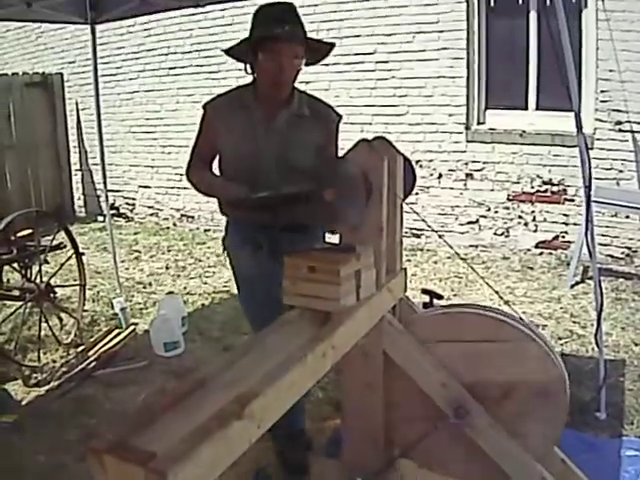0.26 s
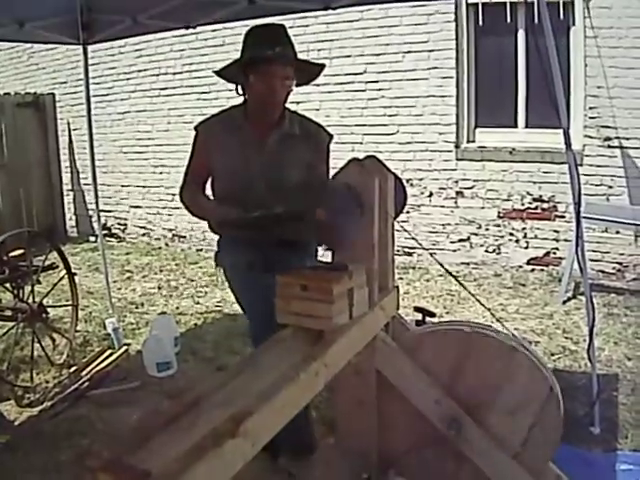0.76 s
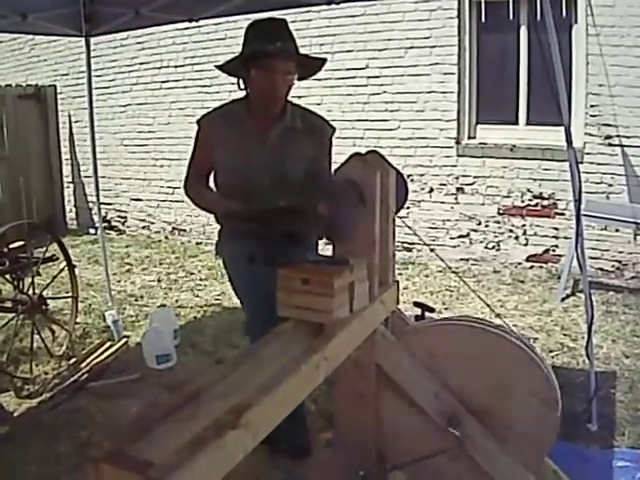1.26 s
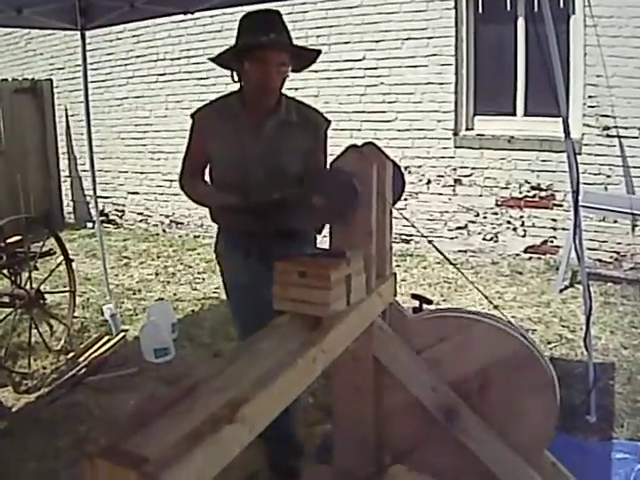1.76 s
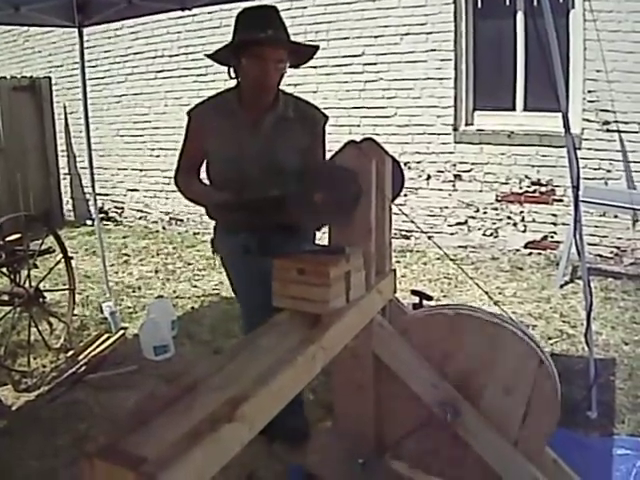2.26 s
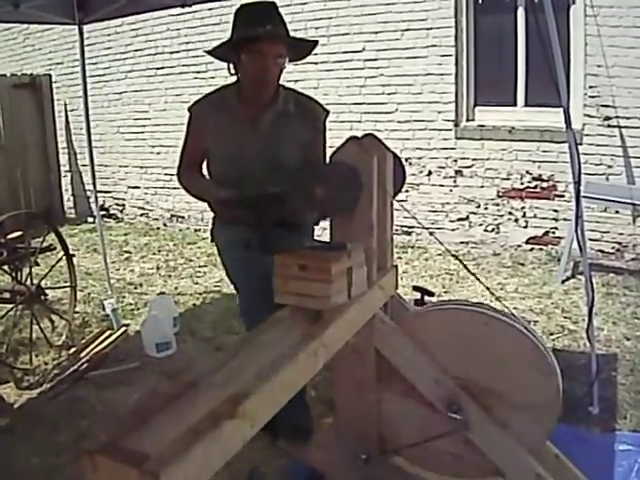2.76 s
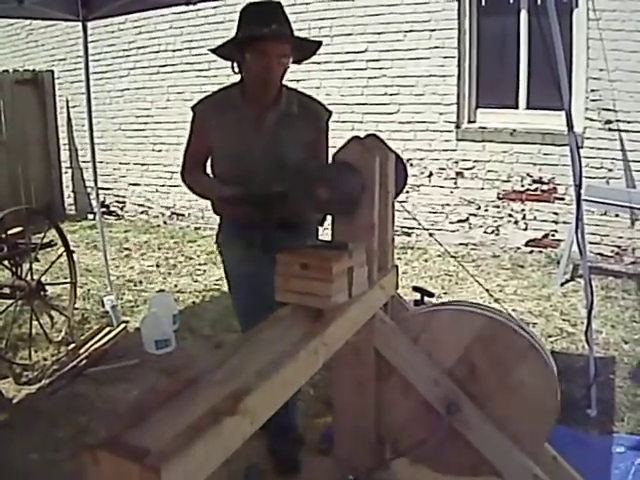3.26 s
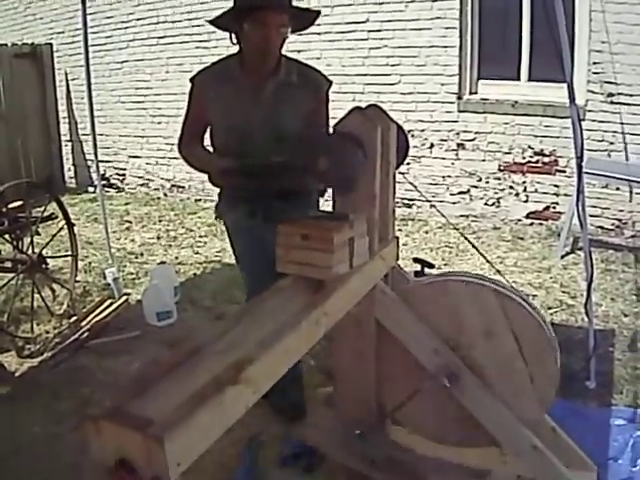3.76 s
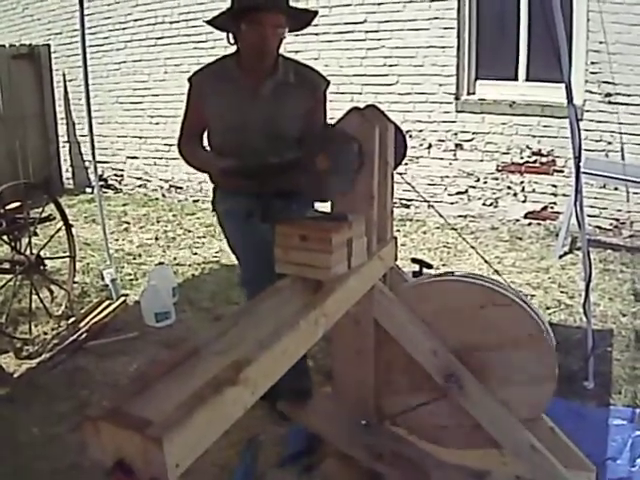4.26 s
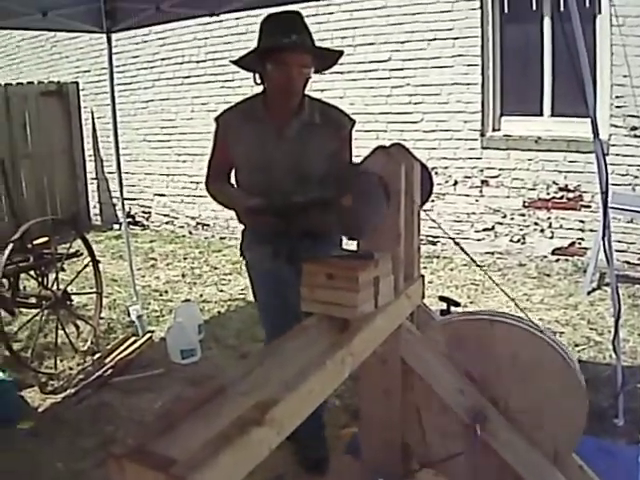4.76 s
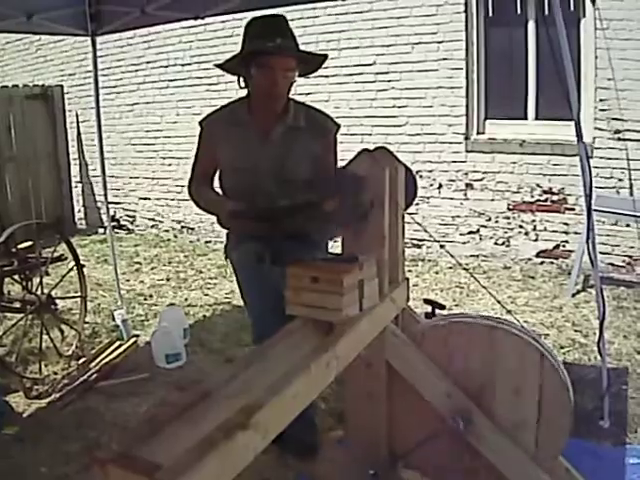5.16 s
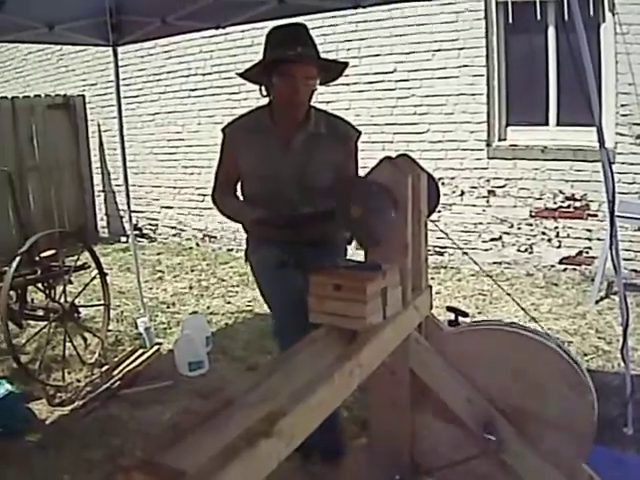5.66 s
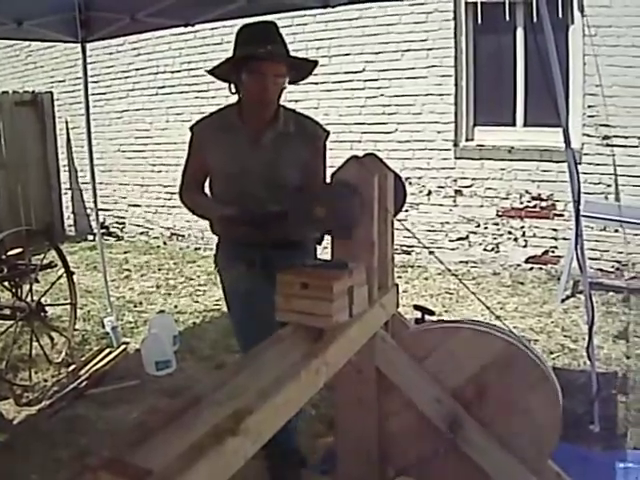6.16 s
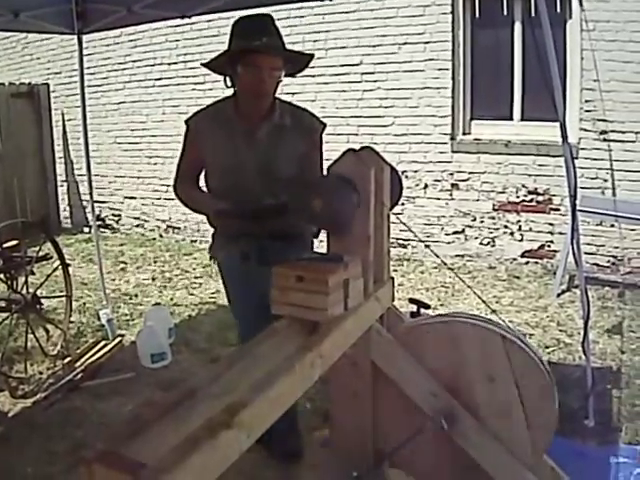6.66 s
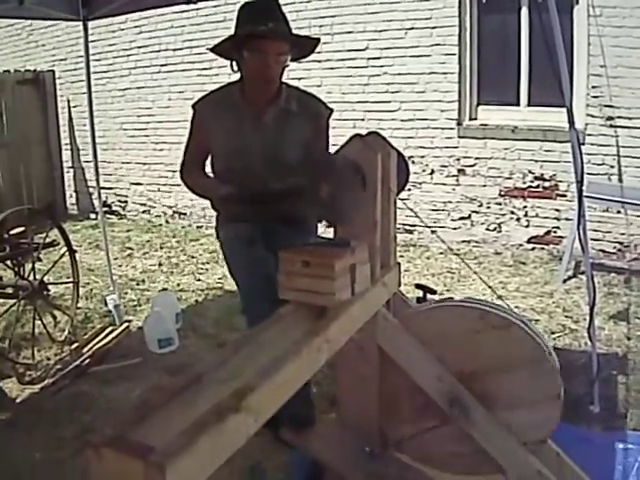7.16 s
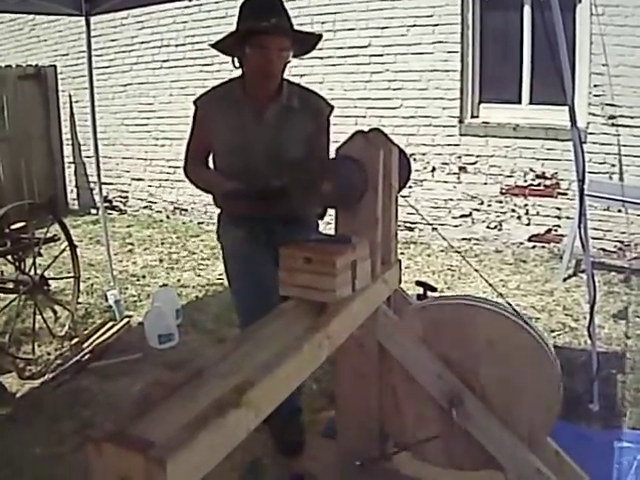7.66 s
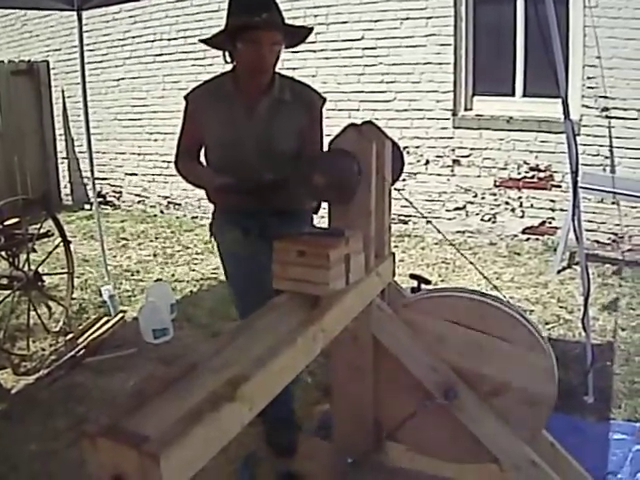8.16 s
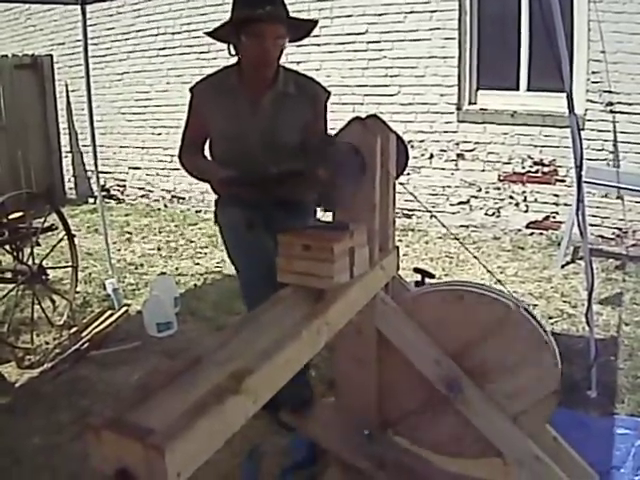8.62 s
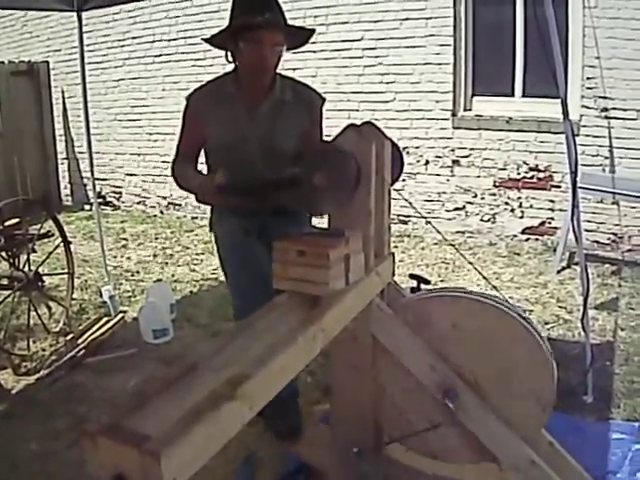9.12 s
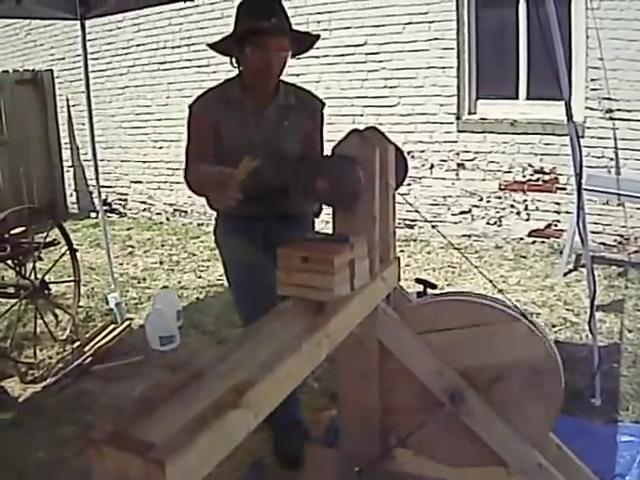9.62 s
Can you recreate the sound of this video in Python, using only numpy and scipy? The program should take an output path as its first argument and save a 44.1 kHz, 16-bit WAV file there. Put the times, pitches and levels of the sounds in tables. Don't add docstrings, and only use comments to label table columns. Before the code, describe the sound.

A wooden treadle lathe is already running and never stops through about 9.9 seconds. Every 0.7 seconds a hard crank slam, from 0.3 seconds onward, is followed by a woody rebound and a hollow stop, with small slack clicks and joint chatter. The gouge rasps steadily but unevenly, snapping about twelve times a second in short runs and peeling a brief hissing shaving after each slam. Rubbing is fuller around 1.1 to 2.3 seconds; rough catches burst at 1.2, 1.9, 3.4 and 5.6. Strong stop knocks come near 4.3, 7.2 and 7.9, and the final stop at 9.3 is weak. Behind, tyre roar and a vehicle's hum swell until 2.6 seconds, then a faint idle and a low drone from about 4.6 continue as traffic thins. Close, short wall echoes; a dull, narrow-band small microphone flattens peaks.

```python
import sys
import numpy as np
from scipy import signal
from scipy.io import wavfile
from scipy.ndimage import uniform_filter1d

SR = 44100
rng = np.random.default_rng(int(sys.argv[2]) if len(sys.argv) > 2 else 0)


def magnitude_from_level(level_db):
    exponent = np.asarray(level_db, float) / 20
    return 10 ** exponent


def generate_wav(sig):
    pcm = np.round(np.clip(np.atleast_2d(sig).T, -1, 1) * 32767).astype(np.int16)
    wavfile.write(sys.argv[1], SR, pcm)


N = 436149

# t/s, low wood level/dB, hard parts level/dB, gouge bite level/dB
TOP_STOPS = [(0.022, -1, -10, -6.5), (1.42, -3, -16, -20), (2.162, -3.5, -12.5, -23.5),
             (2.918, -2.5, -16, -16), (3.632, -1, -5, -12), (4.341, 0.5, -10, -14.5),
             (5.034, -3.5, -15.5, -22), (5.78, -5.5, -18.5, -22.5), (6.513, -3, -11, -7.5),
             (7.208, 0.5, -9, -6), (7.936, 0, -9, -6.5), (8.638, -3.5, -11.5, -9.5), (9.337, -16, -20, -16)]
SLACK_BLOWS = [(0.288, -14.5, -19.5, -21), (1.743, -13, -14, -21.5), (3.202, -11.5, -15, -25),
               (3.6, -13.5, -14, -23), (3.919, -15.5, -14.5, -8), (4.324, -15, -11.5, -9),
               (4.618, -8.5, -15.5, -6), (6.123, -6.5, -20, -8), (6.528, -11, -15.5, -14),
               (6.821, -10, -15.5, -1.5), (7.513, -10, -14.5, -3.5), (8.216, -8, -13, -2.5),
               (8.925, -7, -10.5, -6.5), (9.617, -10, -20.5, -25)]
CRANK_SLAMS = [(0.323, -7.5, -8, -3.5, -20.5), (1.051, -6.5, -7.5, -11, -18), (1.778, -8, -9.5, -1, -15.5),
               (2.527, -9, -12.5, -1.5, -17), (3.24, -15.5, -9, -15, -18), (3.952, -12, -9, -5, -14.5),
               (4.651, -6, -8.5, -18.5, -18), (5.407, -8.5, -8.5, -5, -18.5), (6.157, -7.5, -7.5, -8, -22),
               (6.852, -6.5, -8, -11.5, -18.5), (7.553, -6, -7.5, -6, -17),
               (8.261, -7.5, -8.5, -10.5, -19.5), (8.967, -16, -8.5, -1, -19.5),
               (9.683, -6.5, -8.5, -1, -22)]
REBOUNDS = [
    (0.48, -4.5, -18.5, -11.5),
    (1.2, -8.5, -13, -5),
    (1.929, -17.5, -19, -9.5),
    (2.684, -11, -19.5, -12),
    (3.385, -19.5, -22, -2),
    (4.469, -6.5, -11.5, -6),
    (4.81, -6.5, -16.5, -4.5),
    (5.568, -11, -21, 0),
    (6.565, -8, -24, -25),
    (6.996, -17, -20.5, -9.5),
]
# rail re plank level/dB, pin re upright level/dB, bite ring f/Hz, bite length t/s
BLOW_KINDS = [
    (-8, -5, 2700, .06),
    (-3.5, -2.5, 3350, .04),
    (-6, -0.5, 3100, 0.061),
    (-22, -1.5, 3330, .04),
]
BLOW_TABLES = (TOP_STOPS, SLACK_BLOWS, CRANK_SLAMS, REBOUNDS)
SHAVING_LAG_S = .012


def evened(x):
    return x / np.sqrt(np.mean(x ** 2) + 1e-20)


def add(mix, s, sound):
    part = mix[max(round(s * SR), 0):][:len(sound)]
    part += sound[:len(part)]


def follow(rows, column):
    rows = np.array(rows)
    return np.interp(np.arange(N) / SR, rows[:, 0], rows[:, column])


def resonate(x, hz, width):
    phase = 2 * np.pi * np.cumsum(hz * np.ones(len(x))) / SR
    turn = np.exp(1j * phase)
    r = np.exp(-np.pi * width / SR)
    return 2 * (turn * signal.lfilter([1 - r], [1, -r], x / turn)).real


def treadle():
    # f/Hz, level/dB, t60/s
    plank_modes = [(715, 3, 0.031), (789, 1, 0.034), (856.5, 1.5, 0.034), (630, -11, 0.11)]
    # f/Hz, level/dB, t60/s
    rail_modes = [(389.4, 0, 0.11), (445, -0.5, 0.089), (486.4, 4, 0.048), (351.4, -11, 0.16)]
    # f/Hz, level/dB, t60/s
    upright_modes = [(1016, 6, 0.041), (1143.6, 10, 0.025), (1298, 8.5, 0.022), (1412, 0.5, 0.048)]
    # f/Hz, level/dB, t60/s
    pin_modes = [(2065, 8.5, 0.024), (1800, -2.5, 0.05), (2334, -2.5, 0.065), (1763, -12.5, 0.06)]
    # t/s, level/dB
    frame_jolts = [(0.322, -26), (1.048, -33.5), (1.2, -17), (1.777, -30.5), (1.929, -23.5), (2.529, -25.5),
                   (3.385, -21.5), (3.632, -19.5), (3.953, -21.5), (4.341, -31), (5.567, -40), (6.16, -27),
                   (6.854, -25), (7.209, -20), (7.934, -14), (8.26, -33.5), (8.967, -29)]
    parts = (plank_modes, rail_modes, upright_modes, pin_modes)
    t = np.arange(6000) / SR
    out = np.zeros(N)
    onset = 1 - np.exp(-t / 0.0019)
    blows = knocks()
    luck = rng.random((len(blows), 4, 4, 2))
    chatter = rng.standard_normal((len(blows), len(t)))
    for (s, db, *rel_db), draws, noise in zip(blows, luck, chatter):
        ring = np.zeros(len(t))
        for modes, part_db, pairs in zip(parts, [0, *rel_db], draws):
            for (hz, mode_db, t60), (u, v) in zip(modes, pairs):
                tone = np.sin(2 * np.pi * hz * (.98 + 0.06 * u) * t)
                ring += magnitude_from_level(part_db + mode_db - 3.2 * v - 60 * t / t60) * tone
        hits = noise * magnitude_from_level(-36.0 - 60 * t / 0.24)
        hits[0] = 1
        knock = signal.fftconvolve(ring * onset, hits)[:len(t)]
        add(out, s - .0005, magnitude_from_level(db + 1.5) * knock)
    for s, db in frame_jolts:
        add(out, s, -magnitude_from_level(db + 1.5) * signal.windows.hann(round(0.0045 * SR)))
    return yard(out)


def knocks():
    out = []
    for rows, (rail_db, pin_db, *_) in zip(BLOW_TABLES, BLOW_KINDS):
        for s, low_db, hard_db, *_ in rows:
            upright_db = hard_db - low_db
            out.append((s, low_db, rail_db, upright_db, upright_db + pin_db))
    return out


def yard(x):
    # t/s, level/dB
    reflections = [(.016, -12), (.025, -21.5), (0.054, -20.5), (.078, -31.5)]
    echoes = np.zeros(SR // 10)
    echoes[0] = 1
    for s, db in reflections:
        echoes[round(s * SR)] = magnitude_from_level(db)
    return signal.oaconvolve(x, echoes)[:N]


def gouge():
    return rubbing() + biting() + catching() + shaving()


def rubbing():
    flutter = evened(uniform_filter1d(rng.standard_normal(N), size=450))
    hiss = evened(blade(fibres(N, per_s=9600, spread_db=5.5)))
    return magnitude_from_level(pressure_db() - 2.5 + 2.8 * flutter) * hiss


def pressure_db():
    # t/s, level/dB
    resting = [(0.0, -30.5), (0.5, -32.5), (1.1, -19), (2.28, -21), (2.64, -30), (3.19, -22.5),
               (3.5, -29.5), (4.24, -23.5), (4.96, -28.5), (5.5, -35), (6.08, -23.5), (6.31, -33),
               (7.13, -34.5), (8.13, -31), (8.48, -37.5), (9.47, -36.5), (9.89, -36)]
    swell_db_per_s, ease_db_per_s = 150, 111.5
    push_share = 0.47
    t = np.arange(N) / SR
    db = follow(resting, column=1)
    for rows, push_db in ((CRANK_SLAMS, -16), (TOP_STOPS, -22.5)):
        for s, low_db, *_ in rows:
            since = t - s - SHAVING_LAG_S
            fall_db = np.maximum(-swell_db_per_s * since, ease_db_per_s * since)
            db = np.maximum(db, push_db + push_share * low_db - fall_db)
    return db


def biting():
    t = np.arange(5000) / SR
    out = np.zeros(N)
    events = bites()
    tears = fibres((len(events), len(t)), per_s=16000, spread_db=3.0)
    for (s, db, hz, length), tear in zip(events, tears):
        tear = evened(tear) * magnitude_from_level(-60 * t / max(length, .01))
        tear[0] = 11
        ring = 1.37 * resonate(resonate(tear, hz, 360), hz, 540)
        steel = 0.84 * blade(tear)
        thud = 0.46 * resonate(resonate(tear, 2200, 2400), 2100, 1500)
        add(out, s - .0005, magnitude_from_level(db) * (ring + steel + thud))
    return out


def bites():
    bite_lags = [.001, -.002, -.007, -.001]
    # first t/s, last t/s, first level/dB, last level/dB, ring f/Hz
    turn_runs = [(0.096, 0.179, -9.5, -14, 3780), (1.191, 1.28, -6, -7.5, 3030),
                 (1.59, 1.681, -3.5, -3, 3413), (2.03, 2.106, -12, -5, 2970),
                 (2.206, 2.347, -10, -9.5, 3050), (3.221, 3.312, -4.5, -8.5, 2970),
                 (4.583, 4.744, -6.5, -4, 3500), (5.246, 5.333, -1.5, -7, 3550),
                 (5.931, 6.27, -13.5, -11, 3450), (6.605, 6.929, -6, -5.5, 3450),
                 (7.285, 7.452, -5.5, -7, 3550), (7.685, 7.85, -10, -19, 3530),
                 (8.019, 8.184, -8, -7, 3650), (8.255, 8.4186, -1, -4, 3590), (8.502, 8.748, -11, -3, 3740),
                 (9.003, 9.0825, -11, -7, 3600), (9.77, 9.839, -20, -11, 3030)]
    # t/s, level/dB, ring f/Hz
    single_bites = [(0.241, -18, 3570), (0.3067, -2.5, 3080), (0.957, -7, 3740), (1.0317, -3.5, 2980),
                    (6.497, -9.5, 3660), (1.442, -9.5, 3260), (1.477, -4.5, 2950), (1.7215, -5, 2880),
                    (1.756, -0.5, 3530), (2.0687, -11.5, 3040), (2.486, -2, 3000), (2.9046, -10.5, 2920),
                    (3.616, -8, 2960), (4.089, -10, 3750), (4.1035, -4, 3420), (4.6255, -2.5, 3190),
                    (5.0536, -5, 3160), (8.83, -13.5, 3670), (5.372, -4, 3100), (5.8097, -3, 3002),
                    (6.166, -4.5, 3050), (6.644, -7, 3460), (6.780, -2.5, 3500), (6.95, -8.5, 3560),
                    (7.189, -7.5, 3680), (7.635, -6.5, 3470), (9.13, -12, 3020), (9.563, -14, 3220),
                    (9.599, -5.5, 3500), (9.663, -1.5, 3020)]
    turn_s, bite_s = .082, .046
    out = []
    for rows, (*_, hz, length), lag in zip(BLOW_TABLES, BLOW_KINDS, bite_lags):
        for row in rows:
            out.append((row[0] + lag, row[3], hz, length))
    for first, last, first_db, last_db, hz in turn_runs:
        for u in np.linspace(0, 1, round((last - first) / turn_s) + 1):
            out.append((first + u * (last - first), first_db + u * (last_db - first_db), hz, bite_s))
    return out + [(*row, bite_s) for row in single_bites]


def catching():
    # t/s, level/dB, length t/s
    dig_ins = [
        (1.204, -9, .004),
        (1.929, -5, .006),
        (3.384, -5, .006),
        (5.568, -7, .0035),
    ]
    t = np.arange(5000) / SR
    out = np.zeros(N)
    for (s, db, length), jam in zip(dig_ins, rng.standard_normal((len(dig_ins), len(t)))):
        held = np.clip(4 * (1.25 - t / length), 0, 1)
        burst = evened(blade(jam) + 1.7 * resonate(jam, 710, 700))
        add(out, s, magnitude_from_level(db) * (burst - .35) * held)
    return out


def shaving():
    shaving_s = .062
    t = np.arange(5000) / SR
    out = np.zeros(N)
    held = np.clip(t / 0.0016, 0, 1) * np.clip((shaving_s - t) / 0.0081, 0, 1)
    tears = fibres((len(CRANK_SLAMS), len(t)), per_s=6000, spread_db=0.0)
    for (s, *_, db), tear in zip(CRANK_SLAMS, tears):
        peel = evened(resonate(resonate(tear, 3520, 990), 3600, 1000))
        add(out, s + SHAVING_LAG_S, magnitude_from_level(db - 85 * t) * peel * held)
    return out


def fibres(shape, per_s, spread_db):
    ticks = rng.standard_normal(shape)
    size_db = spread_db * np.clip(rng.standard_normal(shape), -2, 2)
    return ticks * magnitude_from_level(size_db) * (rng.random(shape) < per_s / SR)


def blade(x):
    # f/Hz, width f/Hz, level/dB
    blade_modes = [(3087, 565, 0), (3500, 119, 3), (3780, 720, -3), (2330, 310, -1.5)]
    out = 0
    for k, (hz, width, db) in enumerate(blade_modes):
        out = out + (-1) ** k * magnitude_from_level(db) * resonate(resonate(x, hz, width), hz, 2 * width)
    return out


def street():
    # t/s, level/dB
    roar_curve = [(0.0, -23), (0.61, -23.5), (1.82, -19.5), (2.31, -20.5), (2.67, -20.5), (2.97, -19.5),
                  (4.24, -19.5), (4.74, -18), (5.76, -23), (6.72, -23.5), (6.94, -24.5), (8.7, -24.5),
                  (9.12, -26), (9.5, -23.5), (9.89, -27)]
    # f/Hz, density level/dB
    roar_spectrum = [(120, -32), (200, -11), (319, -16), (372, -7), (495, -2), (683, -3.5), (1020, 1),
                     (1600, -6), (3270, -17.5), (3820, -23), (4400, -49.5), (5720, -72), (9680, -120)]
    # f/Hz, density level/dB
    rumble_spectrum = [(18, -37.5), (30, -19), (48, -55), (107, 6.5), (172, -8.5), (232, 6), (276, -0.5),
                       (350, 4), (460, -28.5), (770, -120)]
    roar_db = follow(roar_curve, column=1)
    rumble_db = -33.5 + 0.54 * (roar_db + 21.5)
    roar = magnitude_from_level(roar_db + 2.5) * wash(roar_spectrum, patchy_db=1.5)
    rumble = magnitude_from_level(rumble_db) * wash(rumble_spectrum, patchy_db=1.0)
    return roar + rumble + engines()


def engines():
    # t/s, firing f/Hz, low orders level/dB, exhaust orders level/dB
    van = [(0.0, 24.52, -46, -39.5), (0.77, 26.76, -38, -36.5), (1.05, 27.36, -39, -36),
           (1.83, 28.7, -32.5, -31.5), (2.07, 26.4, -35.5, -27.5), (2.37, 25.97, -34, -26.5),
           (2.52, 25.5, -37.5, -35.5), (2.65, 25.4, -50, -31)]
    # multiple, level/dB
    body_orders = [(3, -11.5), (4, -3), (5, -0.5), (6, -1.5)]
    # multiple, level/dB
    pipe_orders = [(8, -1), (9, 1.5), (10, -4)]
    # t/s, firing f/Hz, level/dB
    idler = [(2.7, 26.4, -48), (3.02, 27.4, -47), (3.78, 25.4, -44), (4.08, 27.7, -50),
             (4.62, 24.25, -40.5), (5.04, 24.5, -45), (5.36, 25.84, -35.5), (6.7, 26.4, -39.5),
             (9.89, 26.52, -49.5)]
    # multiple, level/dB
    idler_orders = [(3, -10.5), (4, 0), (6, -2.5), (8, -11.5)]
    # t/s, f/Hz, level/dB
    drone_curve = [(4.6, 119.0, -49.5), (4.85, 119.1, -39.5), (5.45, 122, -35), (9.58, 130.8, -40),
                   (9.89, 127.6, -32)]
    body = engine(van, body_orders, blur_hz=4, fuzz=.3, column=2)
    exhaust = engine(van, pipe_orders, blur_hz=6.6, fuzz=.45, column=3)
    pipe = resonate(exhaust, hz=237, width=36)
    idling = engine(idler, idler_orders, blur_hz=2.7, fuzz=0.54, column=2)
    drone = engine(drone_curve, [(1, 0.0034)], blur_hz=7.2, fuzz=.3, column=2)
    return body + pipe + idling + drone


def engine(rows, orders, blur_hz, fuzz, column):
    t, out = np.arange(N) / SR, np.zeros(N)
    for multiple, db in orders:
        hz = multiple * follow(rows, column=1)
        steady = np.sqrt(2) * np.sin(2 * np.pi * np.cumsum(hz) / SR)
        noise = rng.standard_normal(N)
        wavering = evened(resonate(resonate(noise, hz, blur_hz), hz, blur_hz))
        out += magnitude_from_level(db) * (steady + fuzz * wavering)
    fade = np.clip(np.minimum(t - rows[0][0], rows[-1][0] - t) / 0.091, 0, 1)
    return magnitude_from_level(follow(rows, column)) * fade * out


def wash(spectrum, patchy_db):
    frames, hz = N // 256 + 5, np.fft.rfftfreq(1024, 1 / SR)
    a, b, patches = rng.standard_normal((frames, 513, 3)).T
    patches = uniform_filter1d(patches, size=10, axis=0)
    patches = evened(uniform_filter1d(patches, size=14, axis=1))
    f, db = np.transpose(spectrum)
    colour_db = np.interp(np.log(hz + 1), np.log(f + 1), db)
    z = (a + 1j * b) * magnitude_from_level(colour_db[:, None] + patchy_db * patches)
    return evened(signal.istft(z, nperseg=1024, noverlap=768)[1][:N])


def scene():
    return (treadle() + gouge() + street())[None]


def low_pass(x):
    return signal.sosfilt(signal.butter(12, 15900, fs=SR, output="sos"), x)


def record(dry):
    edge_hz, knee, ceiling, offset = 4047, .65, .715, -.006
    lowpass = signal.firwin(161, edge_hz, window=("kaiser", 9), fs=SR)
    narrow = signal.oaconvolve(dry, lowpass[None], "same")
    room = ceiling - knee
    over = np.maximum(abs(narrow) - knee, 0)
    held = np.clip(narrow, -knee, knee) + np.sign(narrow) * room * np.tanh(over / room)
    return low_pass(held + offset)


dry = scene()
out = record(dry)
generate_wav(out)
```